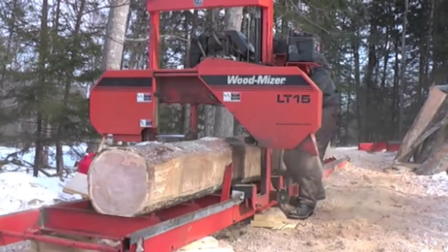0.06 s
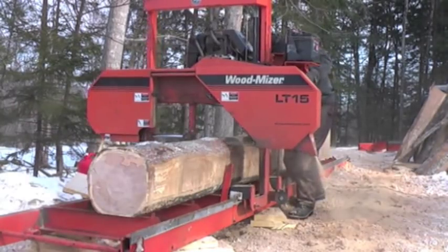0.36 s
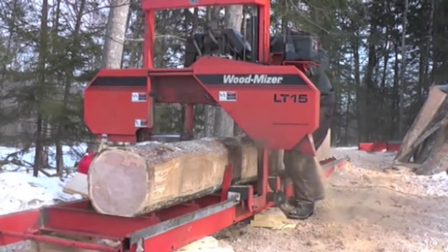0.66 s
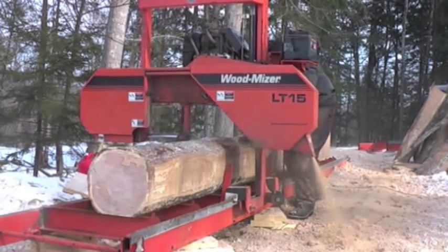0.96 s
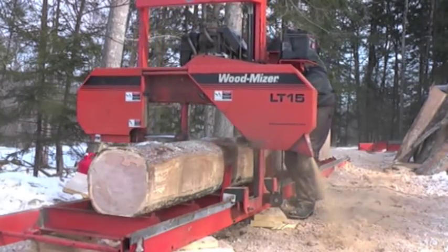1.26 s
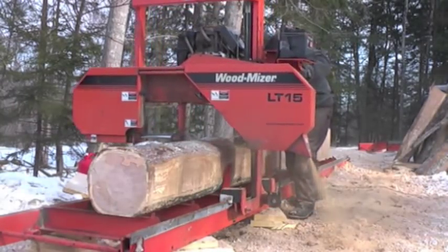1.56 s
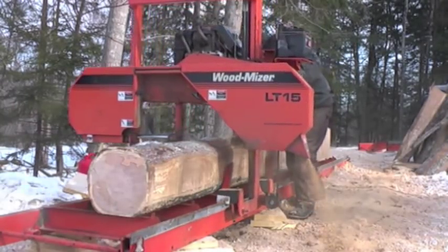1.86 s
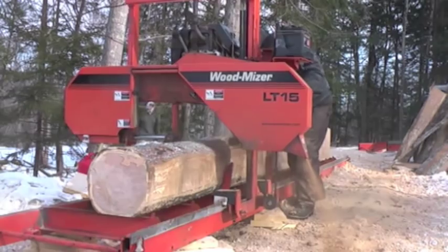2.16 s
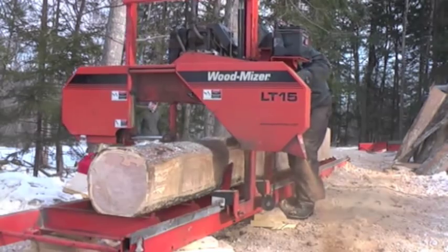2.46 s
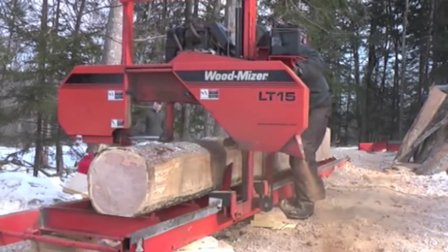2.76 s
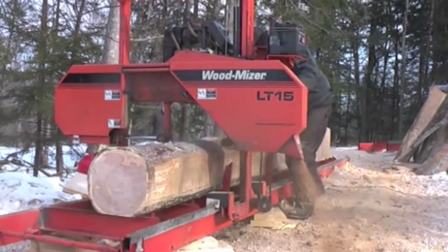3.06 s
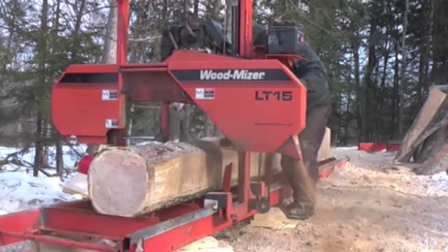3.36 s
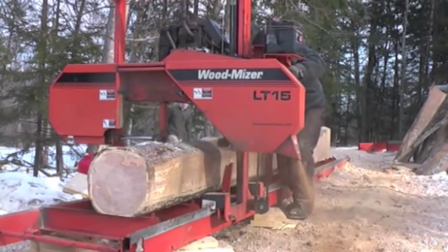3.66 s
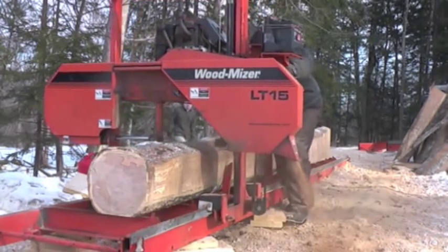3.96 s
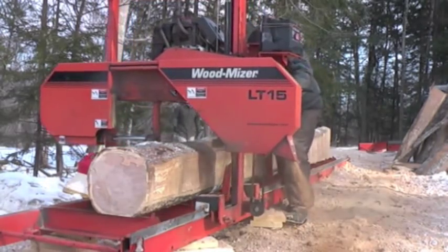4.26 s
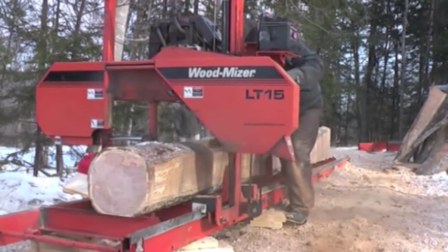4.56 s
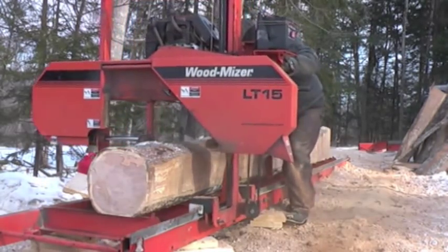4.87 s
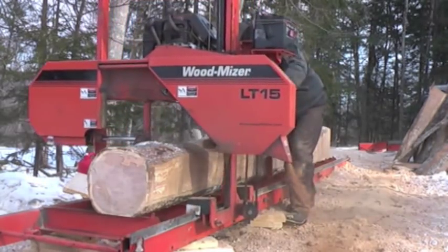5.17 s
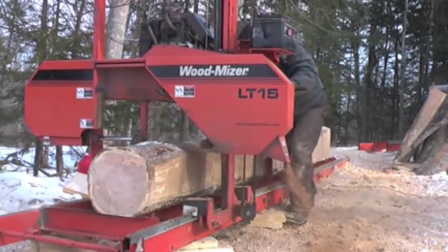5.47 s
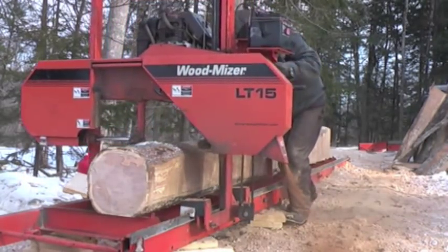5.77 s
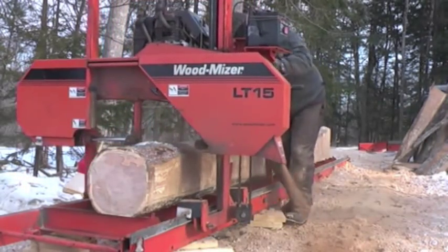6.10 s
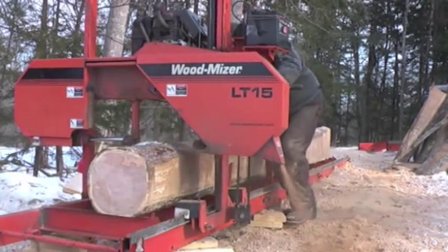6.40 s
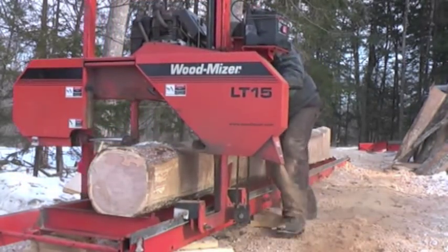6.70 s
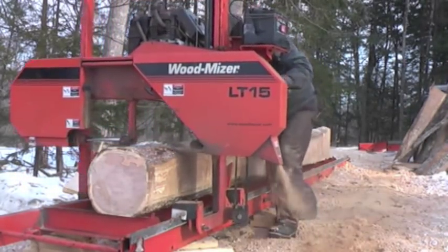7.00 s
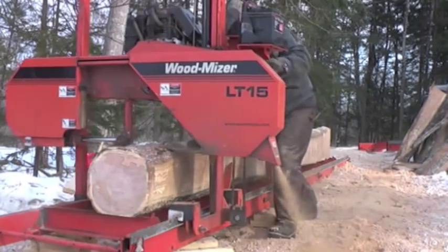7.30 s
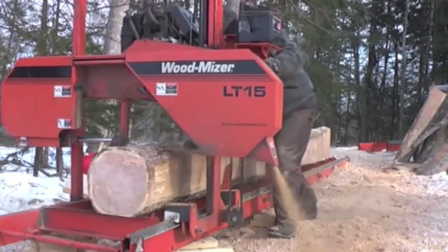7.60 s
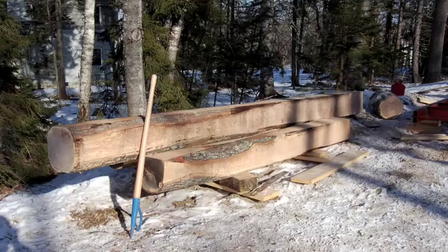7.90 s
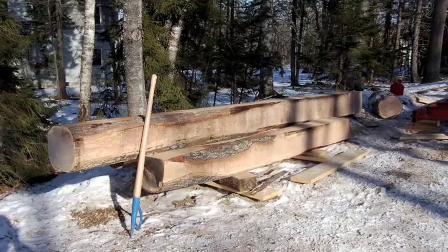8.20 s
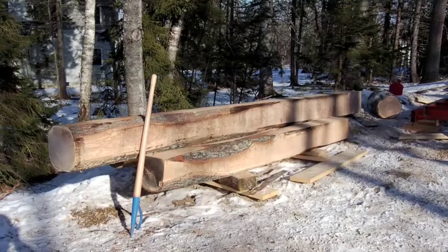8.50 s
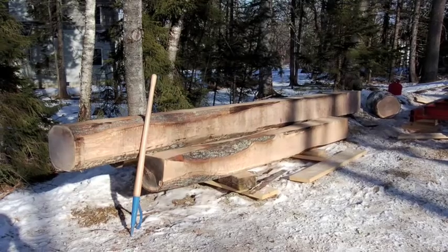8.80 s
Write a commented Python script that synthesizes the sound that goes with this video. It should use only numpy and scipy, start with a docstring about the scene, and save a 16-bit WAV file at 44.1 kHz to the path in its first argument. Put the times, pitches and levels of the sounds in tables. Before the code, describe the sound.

A portable sawmill cuts a log, its small engine thumping rapidly under load beneath a rasping, faintly ringing blade.

```python
"""A portable band sawmill cuts a log outdoors, a few metres away.
From the start its single-cylinder four-stroke petrol engine fires about 29 times a second, sagging
under load: each firing a muffler thump, a gas blast and a ping. Between firings the steel band hisses
and rasps through the wood. From about 2.5 s, band and guard sing out now and then.
At 7.8 s everything fades quickly to silence."""
import sys
import numpy as np
from scipy import signal
from scipy.fft import rfft, irfft, next_fast_len
from scipy.io import wavfile
from scipy.ndimage import uniform_filter1d, map_coordinates

SR = 44100
rng = np.random.default_rng(int(sys.argv[2]) if len(sys.argv) > 2 else 0)


def generate_wav(sig):
    """Save sig (samples, or channels by samples) to the path in sys.argv[1] as 16-bit PCM at SR."""
    pcm = np.round(np.clip(np.atleast_2d(sig).T, -1, 1) * 32767).astype(np.int16)
    wavfile.write(sys.argv[1], SR, pcm)


N = 390285

# engine speed: time_s, firing_hz
ENGINE_SPEED = [(0.0, 29.417), (0.48, 28.089), (1.02, 28.625), (1.23, 28.443), (2.07, 28.987),
                (2.43, 29.39), (2.78, 29.33), (3.22, 29.465), (3.56, 29.951), (4.23, 28.932),
                (4.67, 29.429), (5.81, 29.269), (6.25, 28.663), (6.76, 29.199), (7.0, 28.937),
                (7.25, 28.061), (7.5, 27.92), (7.9, 29.05)]
# muffler resonances, low to high: pitch_hz, width_hz, gain_db
CHUG_MODES = [(70.4, 28, -66.5), (120, 77, -44)]
BOOM_MODES = [(204.4, 11, -40), (249.8, 34.6, -34.5)]
DRONE_MODES = [(280.6, 31.6, -38.5), (324, 5.3, -45)]
BARK_MODES = [(339.3, 13, -35.5), (377.4, 7.5, -44), (426, 7.4, -41), (684.4, 44, -43), (930, 170, -52)]
# muffler tone, towards boom and away from drone: time_s, tilt_db
MUFFLER_TILT = [(0, 2), (.8, -2), (2.7, 1), (3.8, -5), (4.4, 1.5), (5.5, 2.5), (7, 2), (7.6, -1)]
# hardest firings: time_s
HARD_FIRINGS = [.415, .733, .804, 1.26, 1.714, 2.37, 4.202, 4.58, 5.362, 5.499, 7.014, 7.617, 7.653]
# blade bite, relative to usual: time_s, bite_db
BLADE_BITE = [(0.0, 2.3), (0.86, -3), (1.17, -0.5), (2.01, -1.5), (2.11, -0.15), (3.24, 0), (3.34, 1.5),
              (3.54, -1.5), (3.84, 1.5), (4.36, -1.2), (5.07, 0), (5.59, -1), (5.69, 1), (6.0, -0.6),
              (6.2, 0.6), (6.41, -1.5), (6.62, 0.8), (7.8, -0.4)]
# steel resonances: pitch_hz, width_hz, gain_db
BAND_MODES = [(4550, 400, -2.5), (8000, 670, -10), (8400, 450, 1), (14350, 500, -7)]
GUARD_MODES = [(518, 43, 0.5), (853, 5.9, 4.5), (1130, 28, -12)]
# swells of ringing steel: centre_s, half_length_s, pitch_hz, width_hz, level_db
SINGING_SWELLS = [(2.8, .5, 1115, 40, -44), (3.5, 0.58, 842, 24.9, -40), (3.8, 0.45, 4600, 297, -44),
                  (3.88, 0.26, 8080, 703, -29), (4.9, .7, 9870, 160, -36), (6.2, .7, 8050, 300, -35.5),
                  (7.55, .45, 898, 50, -40)]
# noise colours: freq_hz, relative_db
BLAST_SPECTRUM = [(30, -44), (120, -30.5), (300, -26.5), (450, -18.5), (700, -6.5), (1350, 1.2), (2300, 1),
                  (3600, 0.5), (4700, -2), (6200, -4.5), (9000, -6.5), (13000, -15.5), (16000, -27.5)]
RASP_SPECTRUM = [(20, -44), (45, -28.5), (120, -17), (185, -2.5), (275, -10), (365, 1), (430, -3),
                 (660, -2), (1200, -5.5), (2400, -5.5), (3400, -8.5), (5000, -7), (16000, -24.5)]
HISS_SPECTRUM = [(500, -49.5), (3500, -32), (6000, -7), (7400, 1), (8400, 0), (9500, -1), (11000, -2),
                 (13000, -5), (14800, -8.5), (16000, -19.5)]
VALVE_SPECTRUM = [(300, -32), (2000, -7.5), (4500, -3.5), (8300, 7.5), (12000, -6.5), (16000, -16)]
AIR_SPECTRUM = [(30, -15.5), (60, -1), (110, -4), (200, -3), (400, -4), (900, -40.5)]
# stereo width of the noise: freq_hz, side_to_mid_db
STEREO_WIDTH = [(50, -5), (150, -8), (300, -16), (650, -21), (1300, -20), (2400, -17), (4000, -21),
                (7500, -20), (10500, -14.5), (14000, -20)]
# stereo balance: freq_hz, left_minus_right_db
STEREO_BALANCE = [(60, 3.3), (200, 1.3), (450, -.4), (1300, .3), (1900, 2.2), (3500, .3), (8000, .3),
                  (11000, 1.2), (14000, .2)]
# stereo phase: freq_hz, left_lead_rad
STEREO_LEAD = [(40, -.15), (110, -0.37), (330, -0.16), (500, 0)]
# closing fade: time_s, gain
FADE_OUT = [(7.81, 1), (7.865, .48), (7.9, .2), (7.92, 0)]

GOVERNED_HZ = 29
# _PER_HZ: per hertz of sag below the governed firing rate
CHUG_DB_PER_HZ, BARK_DB_PER_HZ, DRONE_DB_PER_HZ = 2, 3.5, -1.5
BODY_DB_PER_HZ, EDGE_DB_PER_HZ = -0.6, 1.3
RASP_DB_PER_HZ, HISS_DB_PER_HZ = -0.3, -2.2
PING_OCT_PER_HZ = 0.5
# change over the carriage's full travel
CHUG_TRAVEL_DB, BARK_TRAVEL_DB, PING_TRAVEL_OCT = -7, -2, -0.38


def muffler(times_s, lead_ms, low_hz, high_hz):
    """The opening exhaust valve's pressure step rings the muffler just ahead of each blast."""
    tilt_db, bite_db = curve(MUFFLER_TILT), curve(BLADE_BITE)
    pulses = amp(59 + 0.55 * bite_db) * kicks(times_s - lead_ms / 1e3, scatter_db=-0.35)
    chug_db = -0.9 + CHUG_DB_PER_HZ * sag_hz() + CHUG_TRAVEL_DB * travel()
    drone_db = -1.2 * tilt_db + DRONE_DB_PER_HZ * sag_hz()
    bark_db = 0.44 + BARK_DB_PER_HZ * sag_hz() + BARK_TRAVEL_DB * travel()
    ring = lambda modes, db: filtered(pulses * amp(db), lambda hz: resonances(modes, hz))
    thump = ring(CHUG_MODES, chug_db) + ring(BOOM_MODES, tilt_db)
    thump += ring(DRONE_MODES, drone_db) + ring(BARK_MODES, bark_db)
    # small outlet: little deep bass; slow valve: little treble
    outlet = signal.butter(3, [low_hz, high_hz], 'bandpass', fs=SR, output='sos')
    return signal.sosfilt(outlet, thump)


def gas_blast(times_s, echo_ms, echo_db, split_hz=3000):
    """Gas leaves the pipe as a steep front in a turbulent burst; one close reflection follows."""
    burst = puffs(times_s, scatter_db=-0.2, rise_ms=0.68, fall_ms=0.99)
    afterflow = amp(-10.5) * puffs(times_s + 0.003, scatter_db=3, rise_ms=2.2, fall_ms=3.6)
    jet = amp(-8.5) * np.hypot(burst, afterflow) * noise(BLAST_SPECTRUM, patchy_db=1.0)
    jitter_s = 0.00025 * rng.standard_normal(len(times_s))
    fronts = kicks(times_s + 0.0001 + jitter_s, scatter_db=4.5)
    jet -= filtered(fronts, lambda hz: resonances([(2540, 2900, 3.3)], hz) / (1 + 1j * hz / 6500))
    # brighter under load
    edge = filtered(jet, lambda hz: 1 - 1 / (1 + (hz / split_hz) ** 4))
    body = jet - edge
    jet = amp(0.3 + BODY_DB_PER_HZ * sag_hz()) * body + amp(0.18 + EDGE_DB_PER_HZ * sag_hz()) * edge
    echo = lambda hz: amp(echo_db) * np.exp(-2j * np.pi * hz * echo_ms / 1e3) / (1 + 1j * hz / 3000)
    return filtered(jet, lambda hz: 1 + echo(hz))


def pipe_pings(times_s, base_hz, scatter_oct, rise_ms, fall_ms, usual_db, scatter_db, hard_db):
    """The tail pipe pings at each firing, a few times hard; pitch rises as the throttle opens."""
    out, t = np.zeros(N), np.arange(SR // 100) / SR
    envelope = (1 - np.exp(-t * 1e3 / rise_ms)) * np.exp(-t * 1e3 / fall_ms)
    starts = ((times_s - 0.0006) * SR).astype(int)
    starts = starts[(starts >= 0) & (starts < N - len(t))]
    force, detune = rng.standard_normal((len(starts), 2)).T
    gains_db = usual_db + scatter_db * force
    for time_s in HARD_FIRINGS:
        nearest = np.argmin(abs(starts / SR - time_s))
        gains_db[nearest], detune[nearest] = hard_db, 0
    drift_oct = PING_OCT_PER_HZ * sag_hz() + PING_TRAVEL_OCT * travel()
    pitches_hz = base_hz * 2 ** (drift_oct[starts] + scatter_oct * detune)
    for start, db, hz in zip(starts, gains_db, pitches_hz):
        out[start:start + len(t)] += amp(db) * envelope * np.sin(2 * np.pi * hz * t)
    return out


def saw():
    """Teeth rasp and ring band and guard, louder with bite and speed; uneven grain adds flutter."""
    bite_db, grain = curve(BLADE_BITE), wobble(rate_hz=14)
    rasp_db = -25 + bite_db + RASP_DB_PER_HZ * sag_hz() + 0.33 * grain
    rasp = amp(rasp_db) * noise(RASP_SPECTRUM, patchy_db=0.7, modes=GUARD_MODES)
    hiss_db = -24 + bite_db + HISS_DB_PER_HZ * sag_hz() + 0.53 * grain + 0.41 * wobble(rate_hz=120)
    hiss = amp(hiss_db) * noise(HISS_SPECTRUM, patchy_db=1.0, modes=BAND_MODES)
    return rasp + hiss


def valves(times_s):
    """A short hiss before each blast; a valve ticks shut about half a cycle later."""
    leak = amp(-22.5) * puffs(times_s - 0.003, scatter_db=5.5, rise_ms=0.93, fall_ms=2.5)
    tick = amp(-28) * puffs(times_s + 0.0195, scatter_db=7, rise_ms=0.51, fall_ms=1.6)
    return np.hypot(leak, tick) * noise(VALVE_SPECTRUM, patchy_db=0)


def singing_steel():
    """The cut feeds narrow resonances of band or guard, each in one swell."""
    out, t = np.zeros(N), np.arange(N) / SR
    for centre_s, half_length_s, pitch_hz, width_hz, level_db in SINGING_SWELLS:
        mode = [(pitch_hz, width_hz, 0)]
        tone = unit_rms(filtered(rng.standard_normal(N), lambda hz: resonances(mode, hz) ** 2))
        swell = np.exp(-((t - centre_s) / half_length_s) ** 2)
        out += amp(level_db) * swell * tone
    return out


def air(level_db):
    """Faint low rumble of air, antiphase in the two channels."""
    rumble = unit_rms(filtered(rng.standard_normal(N), lambda hz: amp(at_hz(AIR_SPECTRUM, hz))))
    return amp(level_db) * np.array([rumble, -rumble])


def firing_times_s():
    """One firing per completed engine cycle."""
    cycles = np.cumsum(curve(ENGINE_SPEED)) / SR
    return np.interp(np.arange(int(cycles[-1]) + 1), cycles, np.arange(N) / SR)


def sag_hz():
    """Drop below the governed firing rate; the throttle opens in step."""
    return GOVERNED_HZ - curve(ENGINE_SPEED)


def travel():
    """Carriage position along the log."""
    return np.linspace(-0.5, 0.5, N)


def kicks(times_s, scatter_db):
    """One impulse of random strength at each time."""
    sizes = amp(scatter_db * rng.standard_normal(len(times_s)))
    inside = (times_s >= 0) & (times_s < (N - 1) / SR)
    return np.bincount(np.round(times_s[inside] * SR).astype(int), sizes[inside], N)


def puffs(times_s, scatter_db, rise_ms, fall_ms):
    """Envelope with an exponential rise and fall around each time."""
    ms = np.arange(-SR // 50, SR // 50 + 1) * 1000 / SR
    shape = np.exp(np.where(ms < 0, ms / rise_ms, -ms / fall_ms))
    return signal.fftconvolve(kicks(times_s, scatter_db), shape, 'same')


def noise(spectrum, patchy_db, modes=()):
    """Coloured stereo noise, rms 1, with resonances and patches of random gain."""
    bins = signal.stft(rng.standard_normal((2, N)), nperseg=512)[2]
    patches = uniform_filter1d(rng.standard_normal(bins.shape[1:]), size=5, axis=0)
    patches = unit_rms(uniform_filter1d(patches, size=7, axis=1))
    pair = signal.istft(bins * amp(patchy_db * patches), nperseg=512)[1][:, :N]
    colour = lambda hz: np.hypot(amp(at_hz(spectrum, hz)), abs(resonances(modes, hz)))
    mid, side = filtered(pair, lambda hz: colour(hz) * amp(np.outer([0, 1], at_hz(STEREO_WIDTH, hz))))
    return unit_rms(np.array([mid + side, mid - side]))


def wobble(rate_hz):
    """Smooth random curve."""
    knots = rng.standard_normal(int(N * rate_hz / SR) + 4)
    return map_coordinates(knots, [np.arange(N) * rate_hz / SR])


def resonances(modes, hz):
    """Summed causal response of band-pass modes."""
    return sum(amp(gain_db) * 1j * hz * width_hz / (pitch_hz ** 2 - hz ** 2 + 1j * hz * width_hz)
               for pitch_hz, width_hz, gain_db in modes)


def filtered(x, response):
    """Apply a complex frequency response."""
    size = next_fast_len(N + SR // 2)
    return irfft(rfft(x, size) * response(np.fft.rfftfreq(size, 1 / SR)), size)[..., :N]


def curve(table):
    """Time table to one value per sample."""
    times_s, values = np.transpose(table)
    return np.interp(np.arange(N) / SR, times_s, values)


def at_hz(table, hz):
    """Frequency table read on a log axis."""
    freqs_hz, values = np.transpose(table)
    return np.interp(np.log(hz + 1), np.log(freqs_hz + 1), values)


def amp(db):
    """Decibels to gain."""
    return 10 ** (np.asarray(db) / 20)


def unit_rms(x):
    """Scale to rms 1."""
    return x / np.sqrt(np.mean(x ** 2) + 1e-20)


def scene():
    """Engine and saw on one carriage, almost straight ahead, creeping left."""
    times_s = firing_times_s()
    thump = muffler(times_s, lead_ms=2.18, low_hz=52, high_hz=1240)
    blast = gas_blast(times_s - 0.0002, echo_ms=3.1, echo_db=-18.5)
    pings = pipe_pings(times_s, base_hz=2780, scatter_oct=0.28, rise_ms=0.53, fall_ms=0.8,
                       usual_db=-6.5, scatter_db=1.5, hard_db=2.5)
    mill = thump + blast + pings + valves(times_s) + saw() + singing_steel()
    sides = np.array([[0.5], [-0.5]])
    pan_db = np.linspace(-0.2, 0.35, N)
    balance = lambda hz: amp(sides * at_hz(STEREO_BALANCE, hz))
    phase = lambda hz: np.exp(1j * sides * at_hz(STEREO_LEAD, hz))
    mill = filtered(mill * amp(sides * pan_db), lambda hz: balance(hz) * phase(hz))
    return mill + air(level_db=-48)


def record(dry):
    """Soft clip, fade-out, low and high cut."""
    ceiling, low_hz, high_hz = 0.9, 34, 15850
    rounded = dry / (1 + np.abs(dry / ceiling) ** 6) ** (1 / 6)
    low_cut = lambda hz: 1 - 1 / (1 + (hz / low_hz) ** 6)
    high_cut = lambda hz: 1 / (1 + (hz / high_hz) ** 300)
    return filtered(rounded * curve(FADE_OUT), lambda hz: low_cut(hz) * high_cut(hz))


dry = scene()
out = record(dry)
generate_wav(out)
```